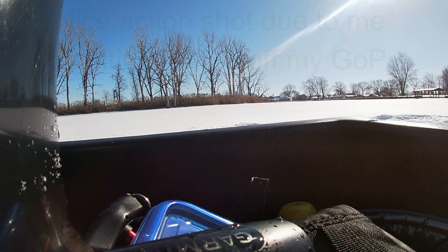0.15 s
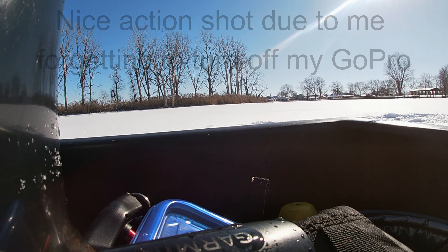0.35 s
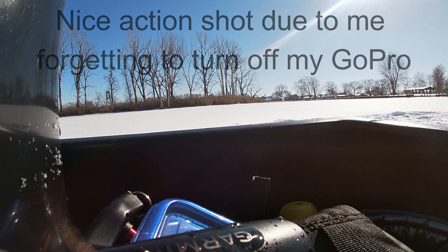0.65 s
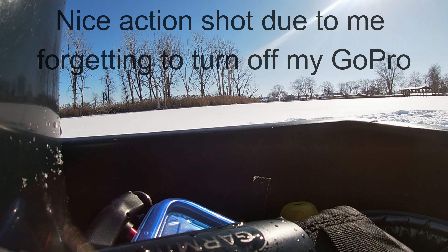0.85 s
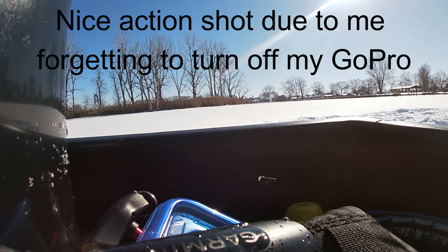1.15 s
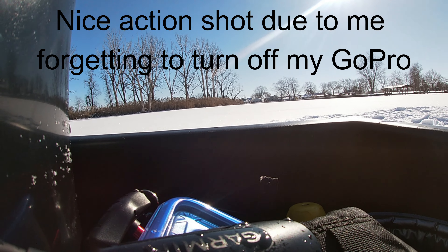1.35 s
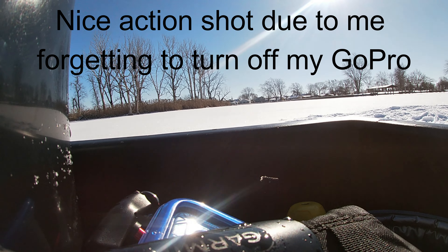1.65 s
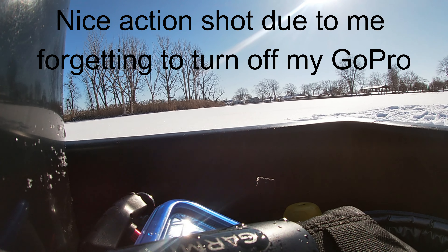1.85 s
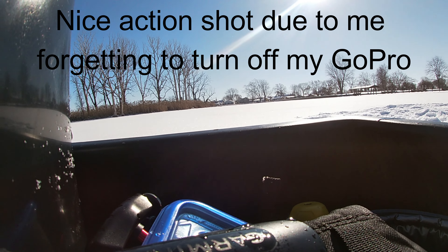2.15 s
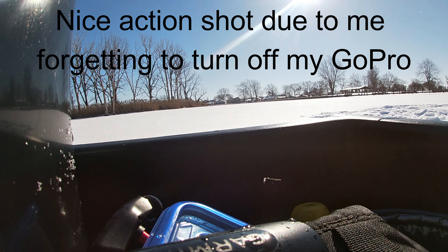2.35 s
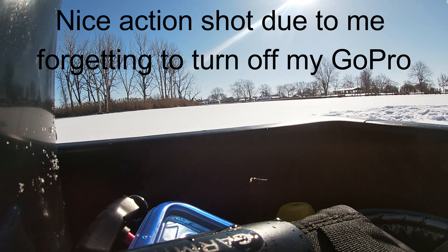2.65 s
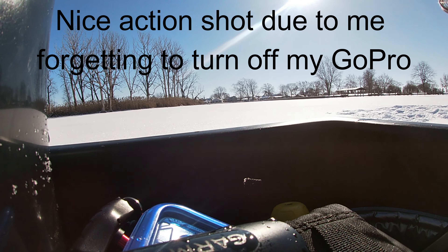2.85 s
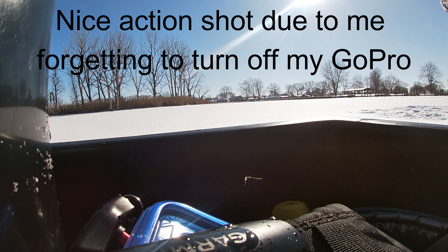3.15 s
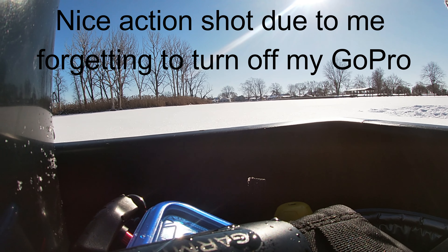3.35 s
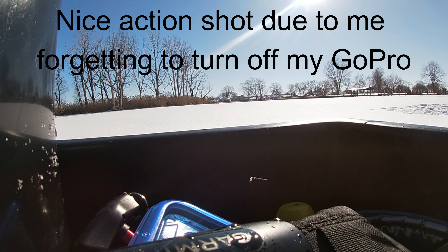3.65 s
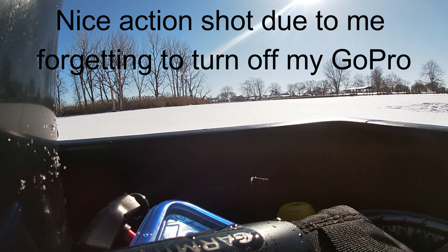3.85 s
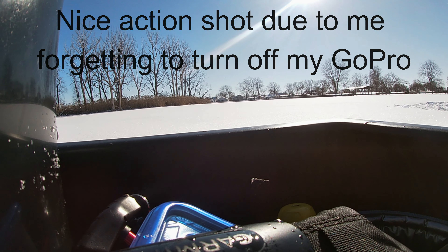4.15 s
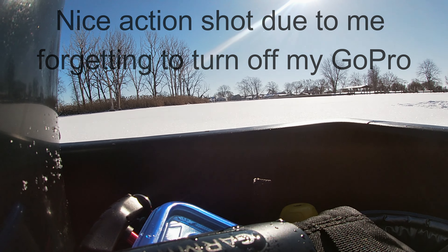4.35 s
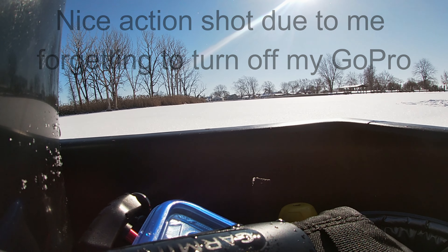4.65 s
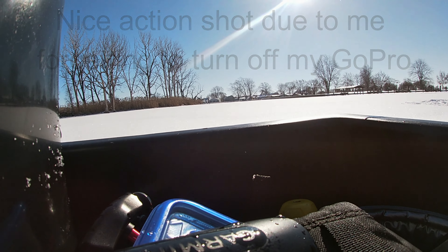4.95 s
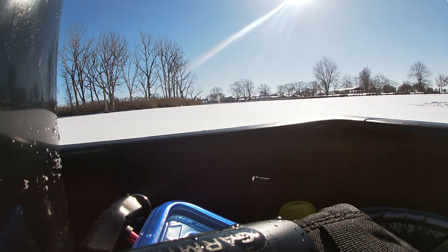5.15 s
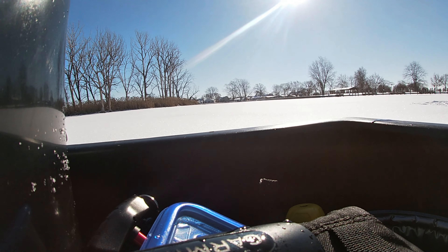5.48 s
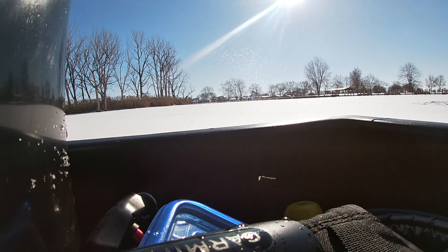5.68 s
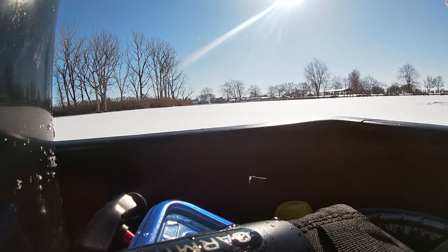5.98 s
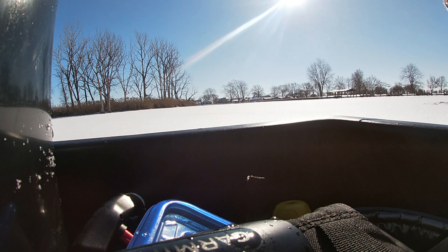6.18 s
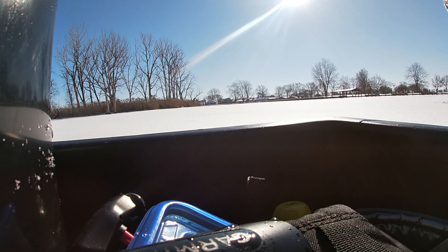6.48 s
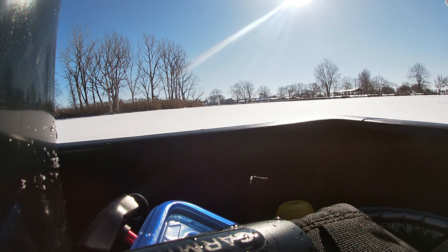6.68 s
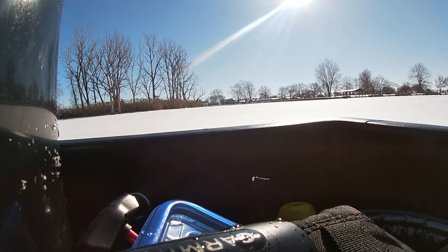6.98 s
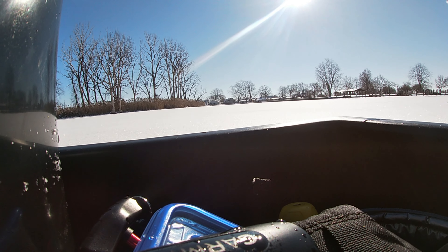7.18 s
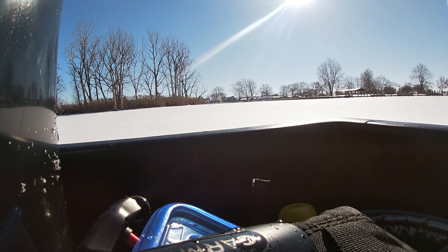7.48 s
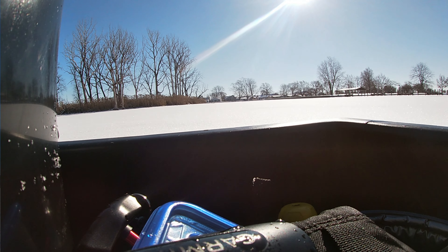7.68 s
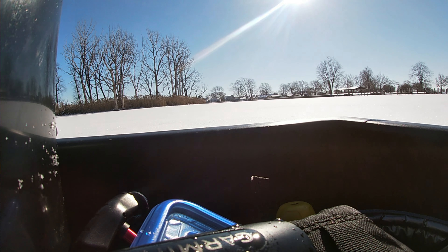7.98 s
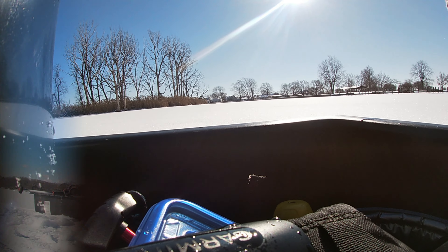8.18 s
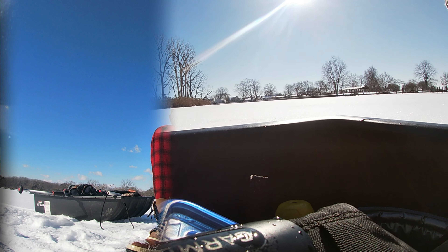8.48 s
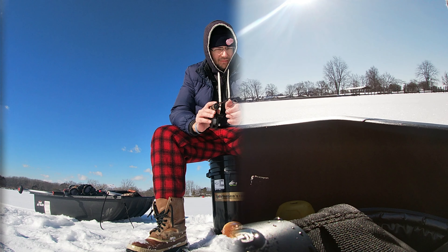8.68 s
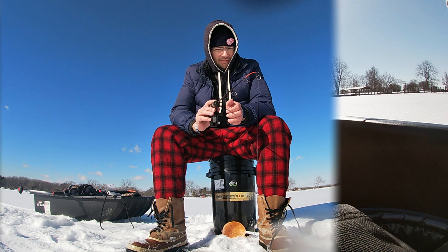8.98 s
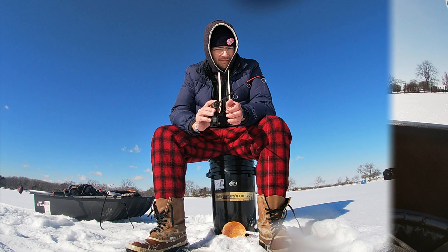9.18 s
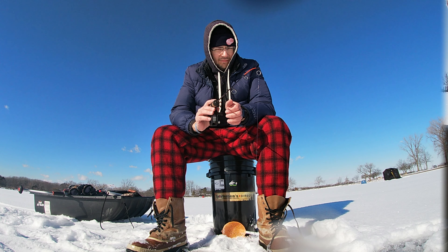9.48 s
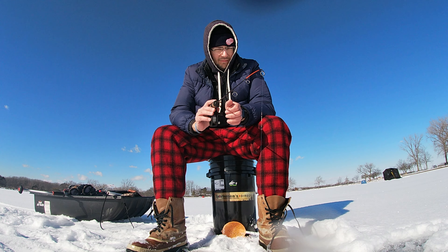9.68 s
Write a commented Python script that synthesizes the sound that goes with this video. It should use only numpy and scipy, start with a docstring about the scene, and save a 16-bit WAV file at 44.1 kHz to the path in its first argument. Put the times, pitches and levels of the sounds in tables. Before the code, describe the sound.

Heard from inside a dragged plastic tub: gritty snow grinding, hollow hull drumming, irregular knocks and rattling gear, then a sudden halt and soft wind rumble.

```python
"""A loaded plastic sled is dragged over crusted snow on a frozen lake, heard from inside its tub.
From the start snow grains hiss and grind along the bottom and crust drums on the hull.
All along the way ridges of ice thump the hull, clack the gear that rings in the tub and slow the sled.
Then the sliding dies away and stops short; wind buffets the microphone, with faint ticks and soft bumps.
A limiter ducks the hardest knocks."""
import sys
import numpy as np
from scipy import signal
from scipy.fft import rfft, irfft, next_fast_len
from scipy.io import wavfile
from scipy.ndimage import uniform_filter1d, minimum_filter1d

SR = 44100
rng = np.random.default_rng(int(sys.argv[2]) if len(sys.argv) > 2 else 0)


def unload_wav(signal):
    """Save mono or channel-first audio to the path in sys.argv[1] as 16-bit WAV at rate SR, clipped to [-1, 1]."""
    wavfile.write(
        sys.argv[1],
        SR,
        np.round(np.clip(np.atleast_2d(signal).T, -1, 1) * 32767).astype(np.int16),
    )


N = 433503


def undb(db):
    """Decibels to gain."""
    return 10 ** (np.asarray(db) / 20)


def unit(x):
    """Scale to rms 1."""
    return x / np.sqrt(np.mean(x ** 2))


def curves(table):
    """Each column of a table after the first, joined by straight lines in time."""
    s, *columns = np.transpose(table)
    return [np.interp(np.arange(N) / SR, s, column) for column in columns]


def colour(x, points):
    """Shape a spectrum by (f/Hz, level/dB) points joined over log frequency; rms 1."""
    hz, db = np.transpose(points)
    size = next_fast_len(N)
    f = np.maximum(np.fft.rfftfreq(size, 1 / SR), 1)
    gain = undb(np.interp(np.log(f), np.log(hz), db))
    return unit(irfft(rfft(x, size) * gain, size)[:N])


def noise():
    """White noise over the whole scene."""
    return rng.standard_normal(N)


def lowpass(x, hz):
    """Gentle two-pole low-pass."""
    return signal.lfilter(*signal.butter(2, hz, fs=SR), x)


def resonate(x, hz, width_hz):
    """One resonance, gain 1 at its centre."""
    return signal.lfilter(*signal.iirpeak(hz, hz / width_hz, fs=SR), x)


def walk(rate):
    """Random levels held 1 / rate s and smoothed twice; rms 1."""
    k = int(SR / rate)
    held = np.repeat(rng.standard_normal(N // k + 1), k)
    return unit(uniform_filter1d(uniform_filter1d(held, k), k)[:N])


def grains(rate, spread_db):
    """Random tiny impacts, rate per second, most of them small and a few large."""
    size_db = spread_db * np.minimum(rng.exponential(size=N), 5)
    return (rng.random(N) < rate / SR) * rng.standard_normal(N) * undb(size_db)


def add(out, s, sound, db):
    """Mix a short sound in at time s with the given peak level."""
    i = int(s * SR)
    out[i:i + len(sound)] += (sound * undb(db) / np.abs(sound).max())[:N - i]


# each layer of the slide: (level/dB, dB per dB of speed, dB per dB of climbing)
HISS_LAW, GRIND_LAW, DRUM_LAW = (-38, 0.94, .85), (-33, 0.97, 0.58), (-23.5, 1, 0.96)
GRIND_PER_FINENESS = .3  # dB per dB: fine crust grinds louder
SLIDE_END_S = 8.722
# pull on the sled, before the ridges brake it: (t/s, speed/dB)
PULL_SPEED = [(0.0, 1.9), (0.55, 1.5), (1.25, 0.9), (1.55, 1), (1.85, -0.1), (2.6, 1.5), (3.05, 0.65),
              (3.8, 2), (4.75, 0.8), (5.1, -3.5), (5.4, -0.1), (5.85, -1.7), (6.5, 1.29), (7.1, 1.7),
              (7.5, 0.1), (8.15, 1.5), (8.45, -5.5), (8.72, -7.84)]
# crust underneath: (t/s, fineness/dB = upper panel modes against lower, lumpiness/dB = extra drumming)
CRUST_SURFACE = [(0, 3, -0.5), (.7, 5, -0.5), (1.15, 1.5, 3.5), (1.8, -1.5, 0), (3.6, -1.5, 0.5),
                 (4.25, -1, -0.2), (5.45, -1, 0.6), (6.5, -1, 0.6), (8.7, -1.5, 1)]
# spectrum of the grinding crust through the plastic: (f/Hz, relative level/dB)
CRUST_COLOUR = [(300, 0.5), (520, -13), (680, -10), (780, 1.5), (950, 3.5), (1150, -1.5), (1370, -5),
                (1520, -2), (1820, -4), (2200, -14), (3000, -13), (6000, -54.5)]
# spectrum of the hissing snow through the plastic: (f/Hz, relative level/dB)
SNOW_COLOUR = [(900, -23), (2300, -4), (2950, -4), (3350, -4.5), (4050, -1.5), (4500, -5.5), (5150, -3.5),
               (6000, -7), (7200, -16.5), (9800, -16.5), (10900, -21.5), (11900, -30), (14000, -35.5),
               (15700, -44)]


def sliding(flutter_db=0.8, grind_flutter_db=0.7, hiss_flutter_db=0.41, rattle_db=-14):
    """Snow and crust break under the hull, louder with speed and climb; fluttering pressure moves them all."""
    climb_db, brake_db = ridges()
    speed_db = curves(PULL_SPEED)[0] - brake_db
    fineness_db, lumps_db = curves(CRUST_SURFACE)
    hiss_db, grind_db, drum_db = (db + by_speed * speed_db + by_climb * climb_db
                                  for db, by_speed, by_climb in (HISS_LAW, GRIND_LAW, DRUM_LAW))
    grind_db = grind_db + GRIND_PER_FINENESS * fineness_db
    pressure = walk(28)

    hiss = colour(grains(rate=34000, spread_db=0.5), SNOW_COLOUR)
    hiss = hiss * undb(hiss_db + hiss_flutter_db * pressure)
    grind = colour(grains(rate=9000, spread_db=0.1), CRUST_COLOUR)
    grind = grind * undb(grind_db + grind_flutter_db * pressure)
    drum = drumming(fineness_db) * undb(drum_db + lumps_db + flutter_db * pressure)
    # the shaking keeps the gear rattling lightly, more so after a clack
    rattle = unit(gear(grains(rate=370, spread_db=0.3)))
    rattle = rattle * (undb(grind_db + rattle_db) + jostle())

    # a linear fade over the last 100 samples makes the stop short
    moving = np.clip((SLIDE_END_S - np.arange(N) / SR) * SR / 100, 0, 1)
    return (hiss + grind + drum + rattle + rumble()) * moving


def drumming(fineness_db):
    """Small lumps of crust drum on the panels, too light to stir the lowest modes much."""
    band = signal.butter(2, [195, 680], "band", fs=SR, output="sos")
    lumps = signal.sosfilt(band, grains(rate=6000, spread_db=0.73))
    panels = unit(hull(lumps))
    lower = signal.sosfiltfilt(signal.butter(4, 255, fs=SR, output="sos"), panels)
    upper = panels - lower
    return lower * undb(-fineness_db / 2) + upper * undb(fineness_db / 2)


# panel modes of the loaded tub: (f/Hz, width/Hz, level/dB)
HULL_MODES = [(145, 17, 1), (173, 43, 10), (199, 32, 6.5), (226.7, 38, 9), (280.5, 46, 4.5), (353, 21, -4),
              (384, 12, -2.5), (507, 37, -41)]


def hull(force):
    """The tub's panels ring under a force."""
    return sum(undb(db) * resonate(force, hz, width) for hz, width, db in HULL_MODES)


# knocks under the sled, from ridges and, at 2.139 and 5.631 s, rebounds after them: (t/s, blow peak level/dB,
# contact/ms, peak level of the load's heave/dB, # peak level of the gear's clack/dB, chatter/ms, brightness of
# the clack/dB per octave)
SLED_KNOCKS = [(0.371, -24, .9, -29, -37, 3, -4), (0.964, -9, 1.4, -27, -33, 4, -2),
               (1.360, -11, 1.1, -32, -35, 3, -4), (1.624, -4.5, 2.7, -16, -18.5, 2.25, 7),
               (2.064, -5, 1.4, -14, -7.5, 4.5, 3.5), (2.139, -9, 4.9, -24, -47, 3.4, -4),
               (2.741, -1.5, 1.4, -40, -7, 2.8, -3), (3.885, 4, 1.3, -9, 4.5, 3.5, 6.5),
               (4.844, -5, 0.9, -7, -8, 2.4, 9.5), (5.431, -9.5, 1.7, -33, -39, 3, -2),
               (5.584, -2, 1.6, -10, -23.5, 5, -1), (5.631, -8.5, 1.8, -12, -38, 3, -4),
               (5.985, -20, 1.5, -23, -41.5, 3.5, -4), (6.975, -12.5, 1.3, -36, -28, 4, -6),
               (7.166, -4.5, 2.2, -9.5, -13.5, 4, -3), (8.082, -11, 1.3, -32, -40, 3, -4),
               (8.181, -5, 2, -10.5, -15.5, 6.4, 3)]


def knocks(heave_hz=77, heave_s=0.0063):
    """Each ridge, or rebound after one, thumps the hull, heaves the load on the springy bottom and throws the
    gear."""
    out, t = np.zeros(N), np.arange(SR // 4) / SR
    heave = np.sin(2 * np.pi * heave_hz * t) * t * np.exp(-t / heave_s)
    for s, blow_db, contact_ms, heave_db, gear_db, chatter_ms, tilt_db in SLED_KNOCKS:
        chatter_s = chatter_ms / 1000
        add(out, s, thump(t, contact_ms), blow_db)
        add(out, s, heave, heave_db)
        # the chatter starts early so that it peaks with the blow
        add(out, s - chatter_s, clack(t, chatter_s, tilt_db), gear_db)
    return out


def thump(t, contact_ms, rebound=0.31, rebound_s=.0115, shudder_db=-21, shudder_s=0.031, stiff_hz=85):
    """A ridge pushes the stiff bottom in, which slaps back and shudders; longer contact sounds duller."""
    rise_s = contact_ms / 1000 / 4  # the push peaks a quarter into the contact
    force = undb(shudder_db) * rng.standard_normal(len(t)) * np.exp(-t / shudder_s) / 2
    force[0] += 1
    force[int(rebound_s * SR)] += rebound
    force = signal.lfilter(*signal.butter(2, stiff_hz, "high", fs=SR), force)
    push = t / rise_s * np.exp(-t / rise_s)
    return hull(signal.fftconvolve(force, push)[:len(t)])


def clack(t, chatter_s, tilt_db, strike_db=10, settle_db=-20, settle_s=.028, soft_hz=6500):
    """Gear is jolted: quick contacts swell to one hard strike, fade and rattle to rest."""
    contacts = rng.standard_normal(len(t)) * (rng.random(len(t)) < 6000 / SR)
    swell = (t / chatter_s * np.exp(1 - t / chatter_s)) ** 2
    force = contacts * (swell + undb(settle_db) * np.exp(-t / settle_s))
    force[int(chatter_s * SR)] += undb(strike_db)
    # plastic yields a little, which blunts each contact
    return gear(lowpass(force, soft_hz), tilt_db)


# a ridge presses harder on the bottom as the sled climbs it, lets go, and brakes the sled for a moment;
# the dB amounts are for a ridge with a 0 dB blow
CLIMB_DB, CLIMB_S, RELEASE_S = 1.5, .07, 0.033
BRAKE_DB, BRAKE_S = 1.5, 0.24
RIDGE_POWER = 0.65  # height of a ridge against the strength of its blow


def ridges():
    """Climbing and braking in dB: each knock, ridge or rebound, loads the bottom before it and slows the sled
    after it."""
    climb, brake = np.zeros(N), np.zeros(N)
    for s, blow_db, *_ in SLED_KNOCKS:
        t = np.arange(N) / SR - s
        height = undb(RIDGE_POWER * blow_db)
        after = np.maximum(t, 0) / BRAKE_S
        climb += height * np.exp(-np.abs(t) / np.where(t < 0, CLIMB_S, RELEASE_S))
        brake += height * after * np.exp(1 - after)
    return CLIMB_DB * climb, BRAKE_DB * brake


def jostle(level_db=-33.5, settle_s=0.2, power=0.55):
    """How much the gear still shakes: every clack stirs it up and it settles again."""
    kicks = np.zeros(N)
    for s, _, _, _, gear_db, *_ in SLED_KNOCKS:
        kicks[int(s * SR)] += undb(level_db + power * gear_db)
    return signal.lfilter([1], [1, -np.exp(-1 / (settle_s * SR))], kicks)


# modes of the hard gear lying in the tub, before random detuning: (f/Hz, t60/s, level/dB)
GEAR_MODES = [(730, .015, -10), (860, .05, -1), (930, .03, -2), (1070, .035, -3), (1590, .022, -11),
              (1780, .014, -5), (1910, .018, -2), (1990, .022, -2), (2700, .008, -20), (4100, .006, -17),
              (5500, .005, -16)]


def gear(force, tilt_db=0):
    """Gear modes ring under a force, varied at random each call; a positive tilt favours the high ones."""
    t = np.arange(SR // 10) / SR
    hz, t60, db = np.transpose(GEAR_MODES)[:, :, None]
    detune, strength_db = rng.standard_normal((2, len(GEAR_MODES), 1))
    side = rng.choice([-1, 1], (len(GEAR_MODES), 1))
    # the tilt pivots at 1 kHz and levels off above 2 kHz
    db = db + strength_db + tilt_db * np.log2(np.minimum(hz, 2000) / 1000)
    tones = np.sin(2 * np.pi * hz * (1 + .008 * detune) * t)
    modes = side * undb(db - 60 * t / t60) * tones
    return signal.fftconvolve(force, modes.sum(0))[:len(force)]


# low rumble of wind and sway: (t/s, level/dB)
RUMBLE_LEVEL = [(0.0, -32), (0.3, -32.5), (1.3, -38), (2.5, -37), (3.1, -44.5), (3.7, -37.5), (4.35, -35.5),
                (4.68, -44.64), (4.95, -33), (5.75, -31.5), (6.45, -40.67), (7.0, -40), (7.65, -32.5),
                (8.3, -31.5), (8.72, -36)]


def rumble(waver_db=2.5):
    """Wind and sway at the riding microphone: deep noise with a wavering level."""
    low = colour(noise(), [(10, -10.5), (22, 5.0), (90, 1.5), (130, 1.5), (260, -32), (1000, -75.5)])
    return low * undb(curves(RUMBLE_LEVEL)[0] + waver_db * walk(9))


WIND_START_S = 8.752
# gusts on the microphone: (t/s, level/dB)
GUST_LEVEL = [(8.75, -26.5), (8.95, -29.53), (9.1, -21.5), (9.22, -23), (9.38, -19.5), (9.46, -13.83),
              (9.55, -29), (9.68, -27.5), (9.78, -20)]
# spectrum of the deep buffeting: (f/Hz, relative level/dB)
BUFFET_COLOUR = [(12, -32), (22, -5.5), (60, 1), (120, -5.5), (170, -16), (220, -27), (300, -39),
                 (620, -69), (1500, -78.5), (8000, -104)]
# spectrum of the smaller eddies: (f/Hz, relative level/dB)
EDDY_COLOUR = [(60, -20), (185, 8.5), (260, -5.5), (400, -19.5), (650, -41.5), (1000, -52), (2000, -70),
               (6000, -93)]
# spectrum of the faint air over the lake: (f/Hz, relative level/dB)
AIR_COLOUR = [(100, -2), (900, -1.5), (1600, -3.5), (2500, -9), (6000, -9), (8000, -21), (15000, -34)]


def wind(eddy_db=-12.0, eddy_growth=2.27, strong_db=-17, flutter_db=6.0, air_db=-79):
    """Gusts buffet the microphone; smaller, brighter eddies grow faster than the gust and come in lumps."""
    gust_db, = curves(GUST_LEVEL)
    buffet = colour(noise(), BUFFET_COLOUR) * undb(gust_db)
    swirl_db = strong_db + eddy_db + eddy_growth * (gust_db - strong_db) + flutter_db * walk(35)
    eddies = colour(noise(), EDDY_COLOUR) * undb(swirl_db)
    air = colour(noise(), AIR_COLOUR) * undb(air_db)
    fade_in = np.clip((np.arange(N) / SR - WIND_START_S) * 100, 0, 1)  # 10 ms
    return (buffet + eddies + air) * fade_in


def burst(t, decay_s):
    """A short puff of noise that swells and dies."""
    return rng.standard_normal(len(t)) * t * np.exp(-t / decay_s)


# faint dry ticks in the wind: (t/s, peak level/dB)
TICK_TIMES = [(8.885, -61), (9.085, -53), (9.119, -53), (9.319, -58.5), (9.385, -57), (9.449, -50)]


def ticks(tick_s=0.00043, tick_hz=2600):
    """Tiny dry ticks: very short noise bursts with the treble softened."""
    out, t = np.zeros(N), np.arange(SR // 10) / SR
    for s, db in TICK_TIMES:
        add(out, s, lowpass(burst(t, tick_s), tick_hz), db)
    return out


# soft bumps at the microphone: (t/s, peak level/dB, upper band edge f/Hz)
MIC_BUMPS = [(9.084, -19.5, 242), (9.134, -27, 197), (9.375, -22, 243), (9.439, -13.5, 250),
             (9.475, -37.5, 750), (9.755, -19.5, 259)]


def bumps(bump_cycles=1.24):
    """Soft bumps: band-limited noise bursts; the lower a bump, the longer it lasts."""
    out, t = np.zeros(N), np.arange(SR // 10) / SR
    for s, db, hz in MIC_BUMPS:
        band = signal.butter(4, [110, hz], "band", fs=SR, output="sos")
        add(out, s, signal.sosfilt(band, burst(t, bump_cycles / hz)), db)
    return out


def scene():
    """The sled, then the wind."""
    return (sliding() + knocks() + wind() + ticks() + bumps())[None]


def limiter(x, ceiling_db=-1.8, release_s=.06, hold=SR // 60):
    """The gain drops just ahead of a peak over the ceiling, holds briefly and creeps back."""
    fall = np.arange(N) / SR / release_s
    over = np.log(np.maximum(np.abs(x).max(0) / undb(ceiling_db), 1))
    # each excess is remembered and fades exponentially
    memory = np.exp(np.maximum.accumulate(np.log(over + 1e-30) + fall) - fall)
    # the hold window reaches 64 samples ahead, and the gain steps are smoothed
    gain = minimum_filter1d(np.exp(-memory), size=hold, origin=hold // 2 - 64)
    return x * uniform_filter1d(gain, size=128)


def record(dry, top_hz=15700):
    """Limit the knocks, then cut the top steeply."""
    return signal.sosfilt(signal.ellip(10, .2, 80, top_hz, fs=SR, output="sos"), limiter(dry))


dry = scene()
out = record(dry)
unload_wav(out)
```